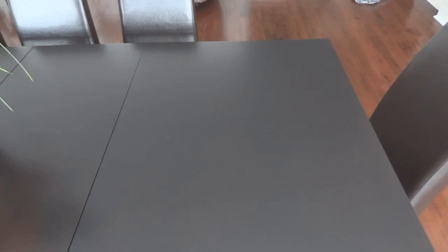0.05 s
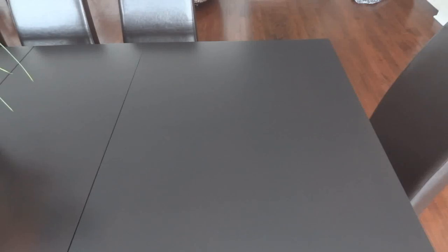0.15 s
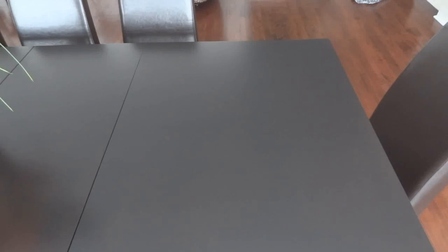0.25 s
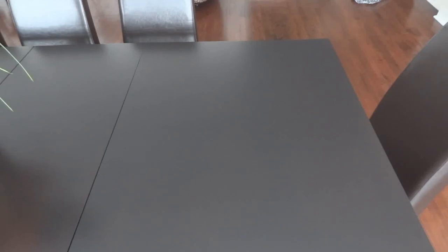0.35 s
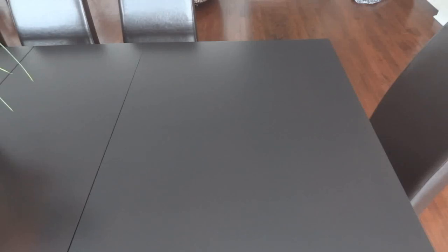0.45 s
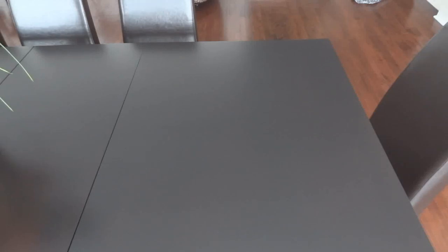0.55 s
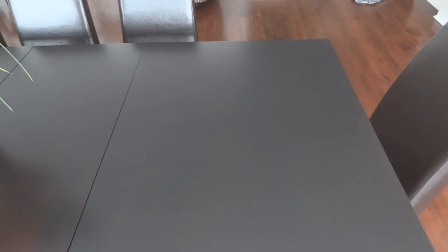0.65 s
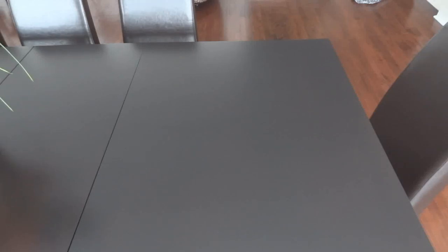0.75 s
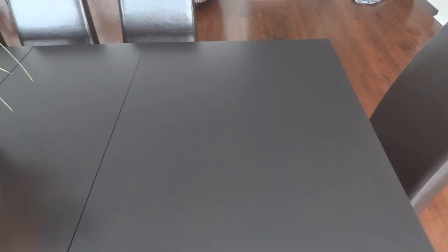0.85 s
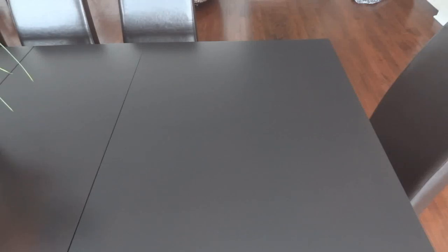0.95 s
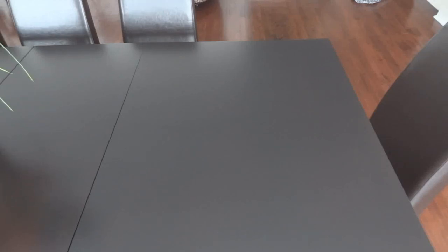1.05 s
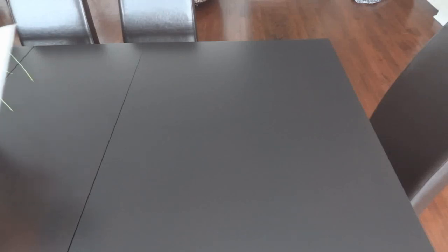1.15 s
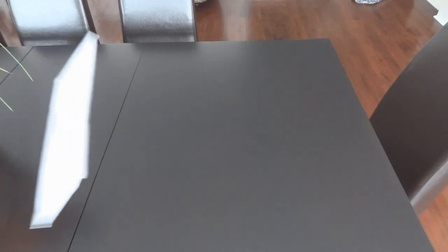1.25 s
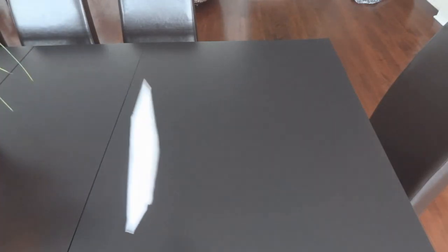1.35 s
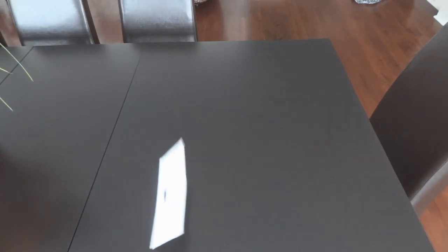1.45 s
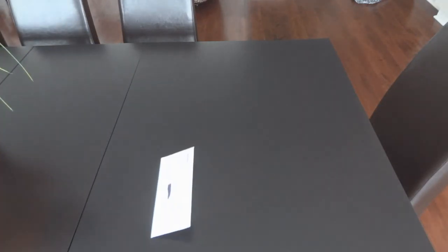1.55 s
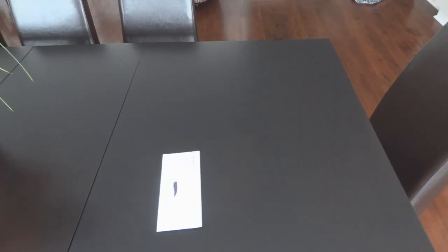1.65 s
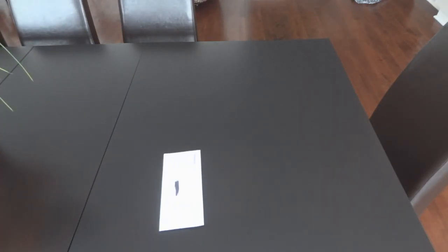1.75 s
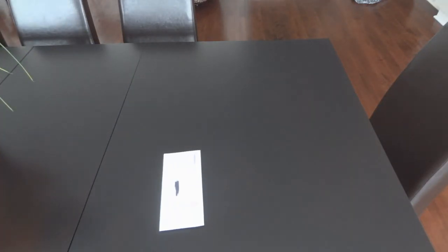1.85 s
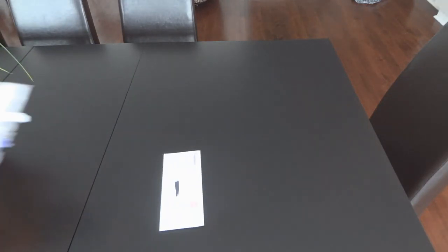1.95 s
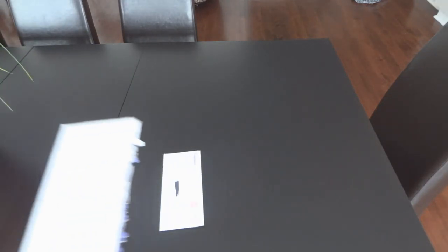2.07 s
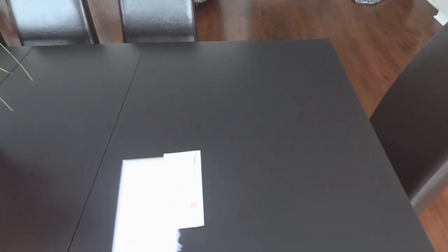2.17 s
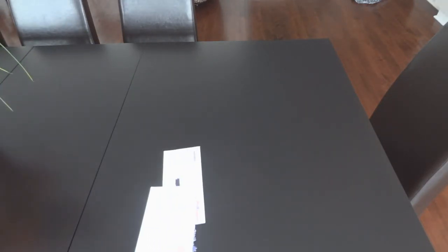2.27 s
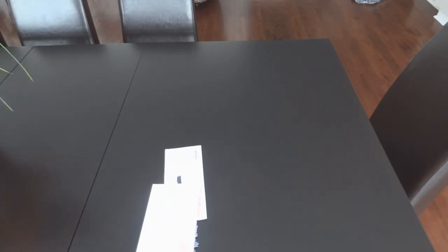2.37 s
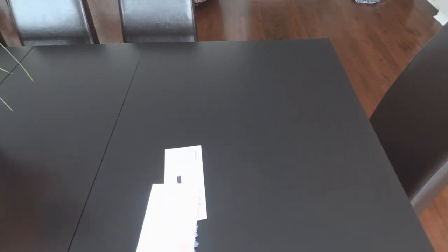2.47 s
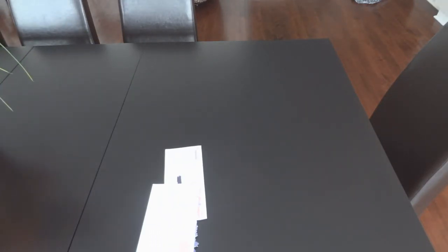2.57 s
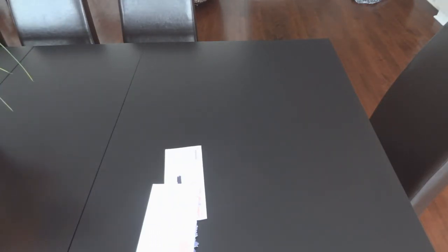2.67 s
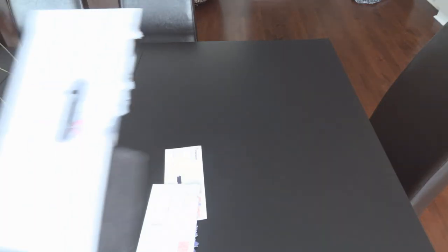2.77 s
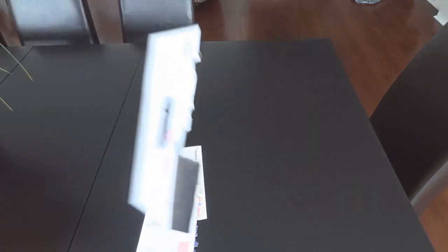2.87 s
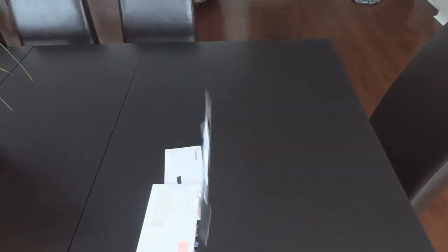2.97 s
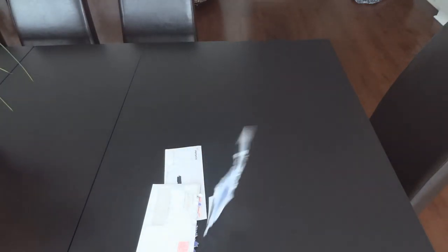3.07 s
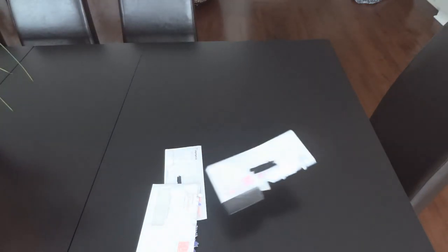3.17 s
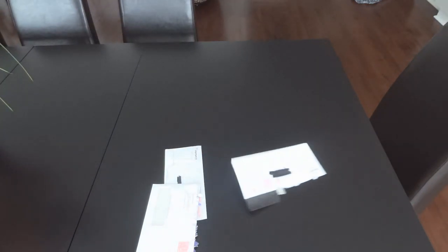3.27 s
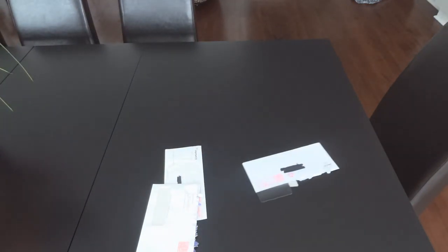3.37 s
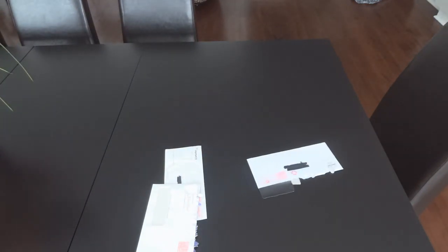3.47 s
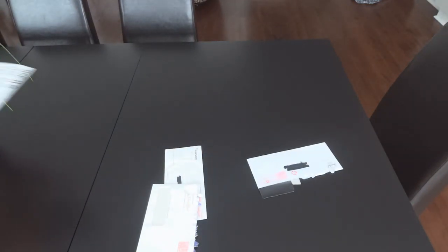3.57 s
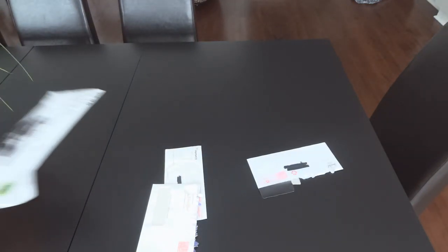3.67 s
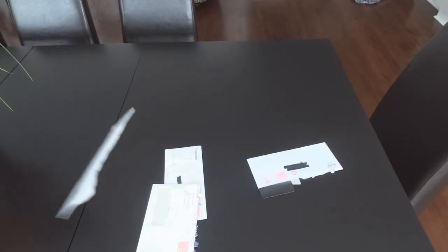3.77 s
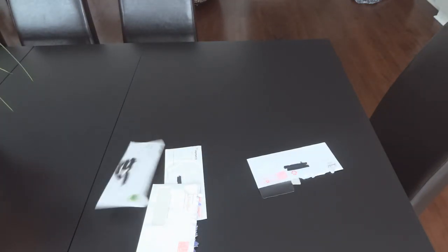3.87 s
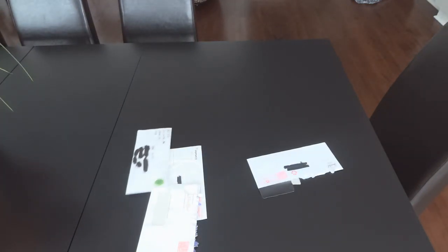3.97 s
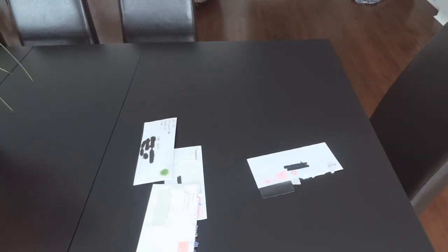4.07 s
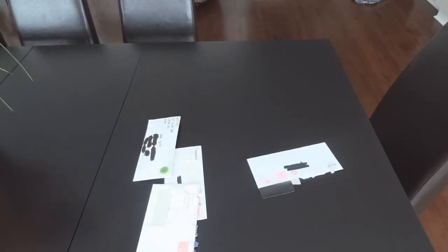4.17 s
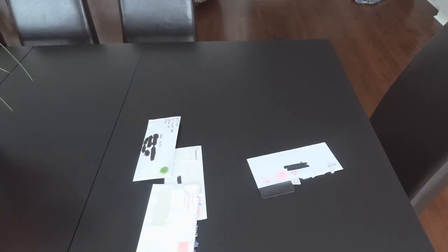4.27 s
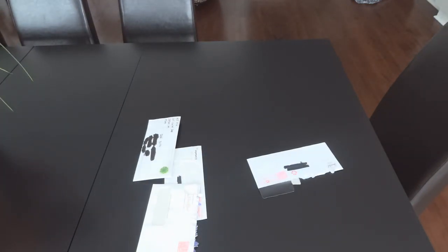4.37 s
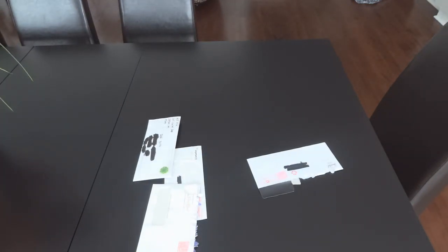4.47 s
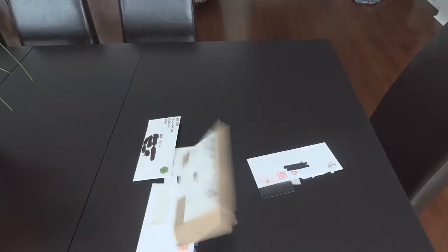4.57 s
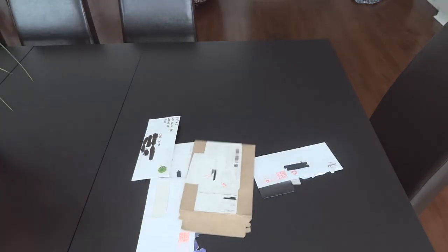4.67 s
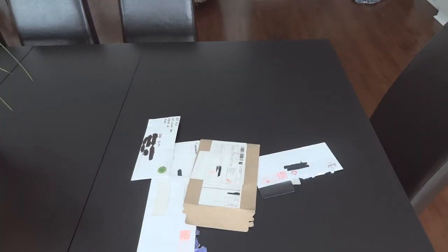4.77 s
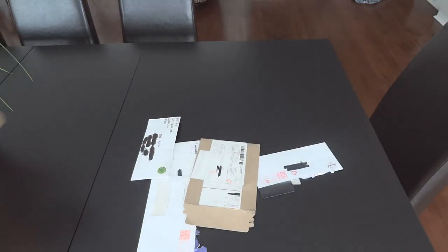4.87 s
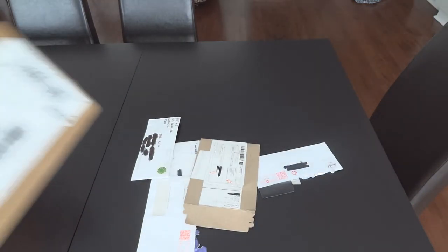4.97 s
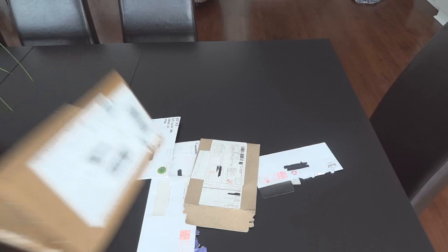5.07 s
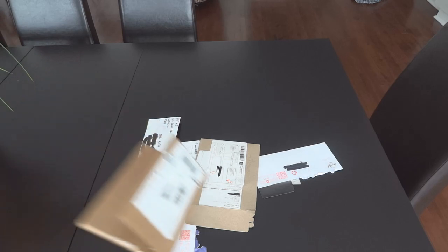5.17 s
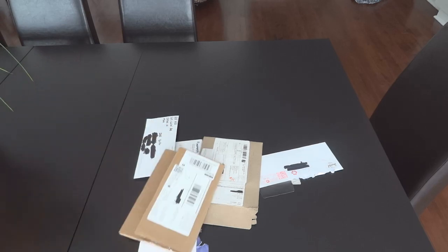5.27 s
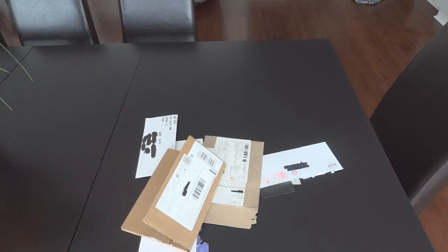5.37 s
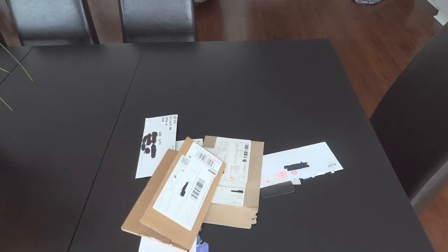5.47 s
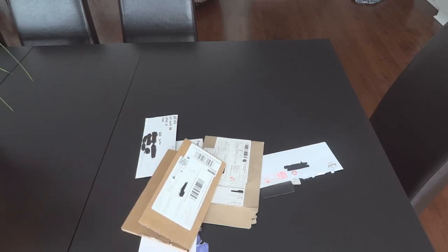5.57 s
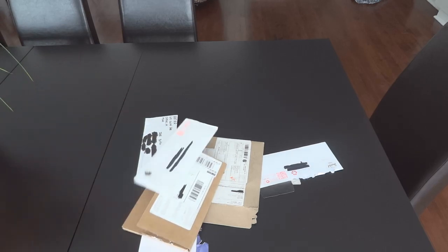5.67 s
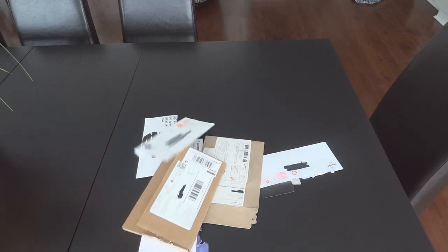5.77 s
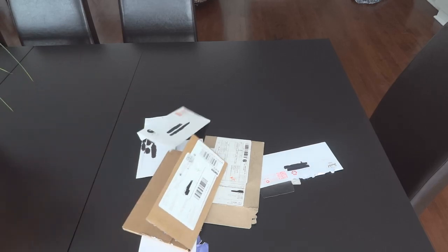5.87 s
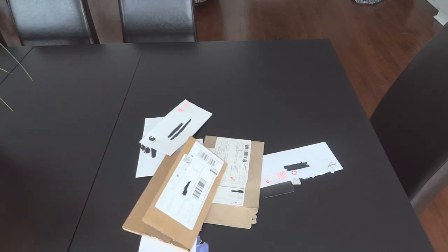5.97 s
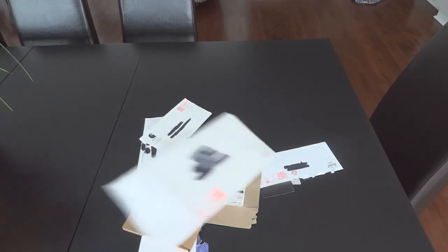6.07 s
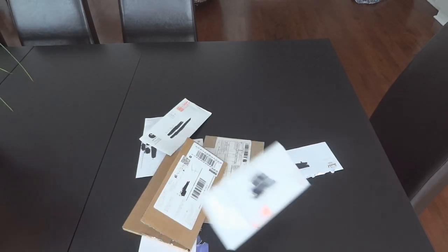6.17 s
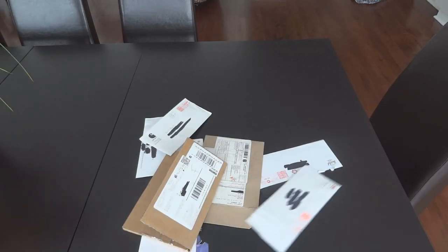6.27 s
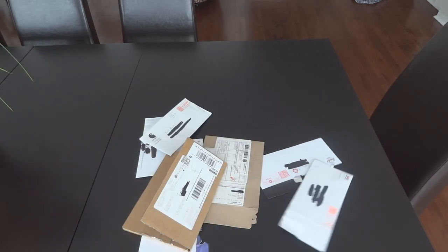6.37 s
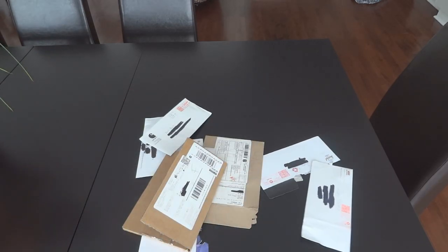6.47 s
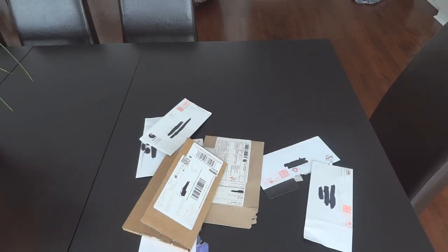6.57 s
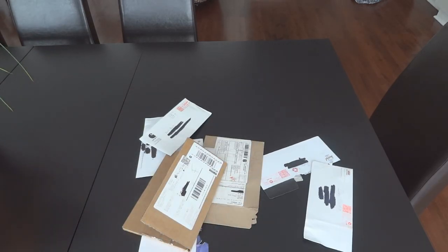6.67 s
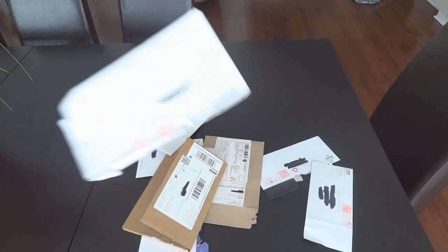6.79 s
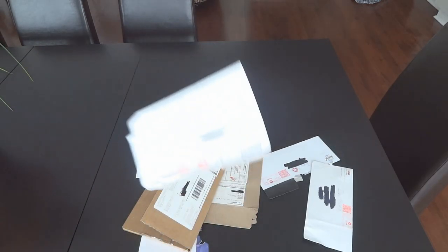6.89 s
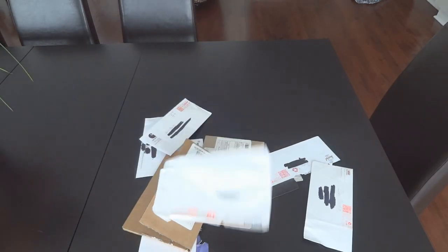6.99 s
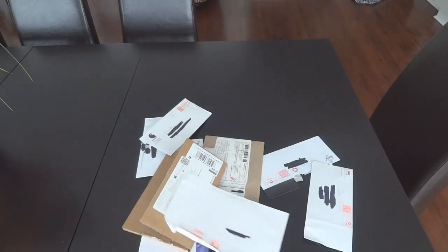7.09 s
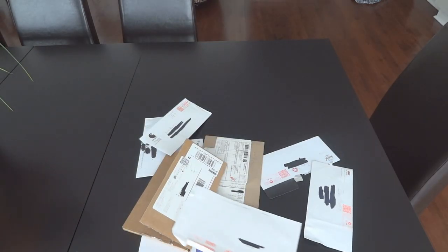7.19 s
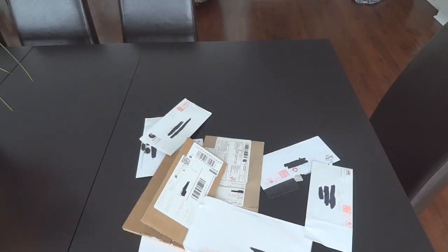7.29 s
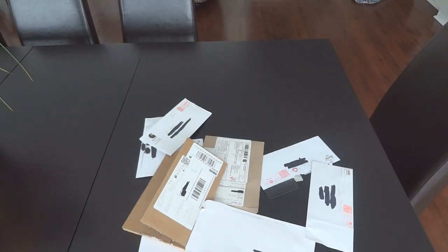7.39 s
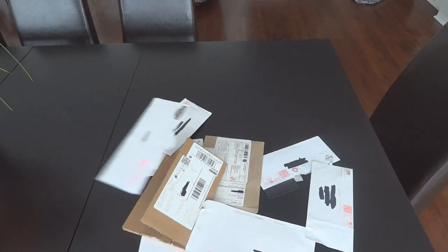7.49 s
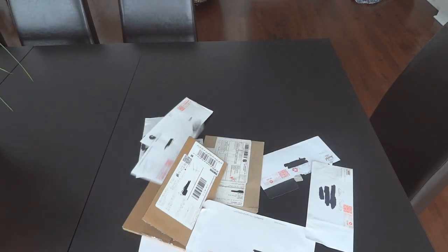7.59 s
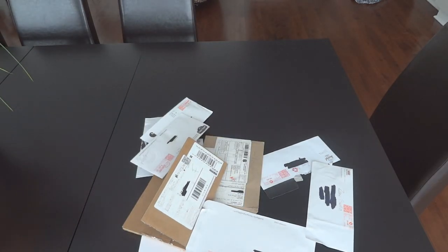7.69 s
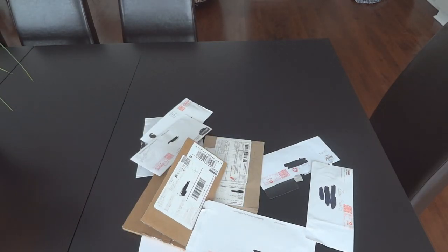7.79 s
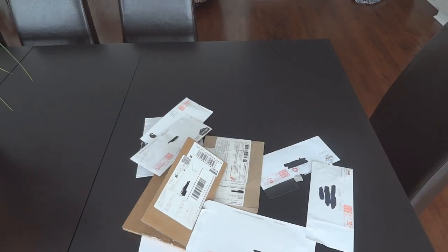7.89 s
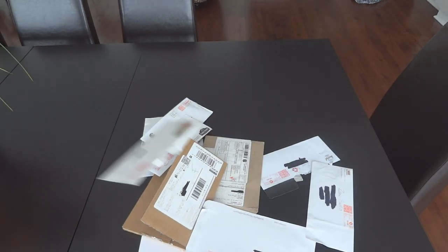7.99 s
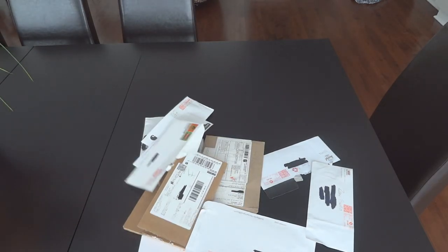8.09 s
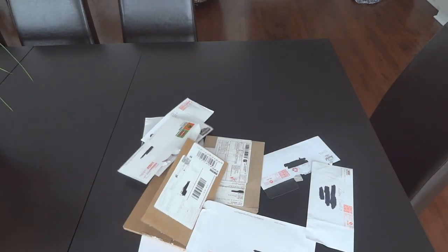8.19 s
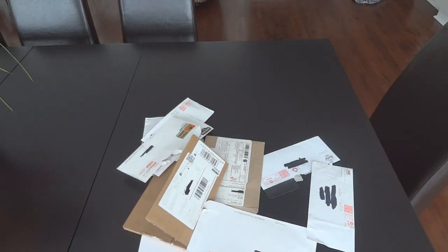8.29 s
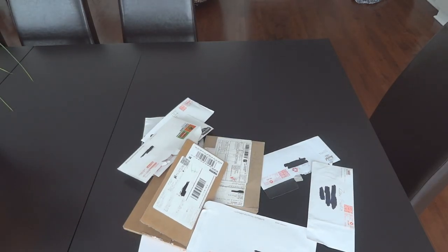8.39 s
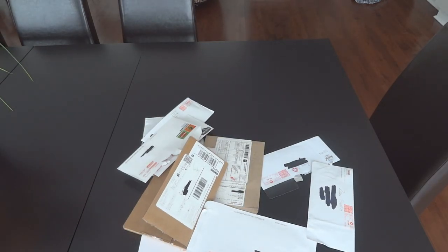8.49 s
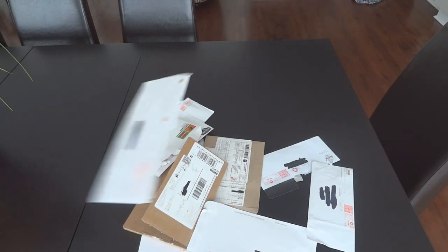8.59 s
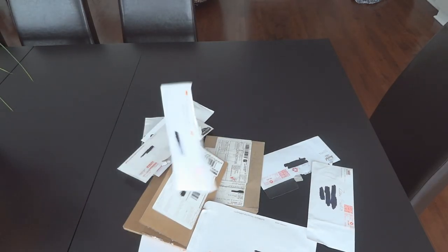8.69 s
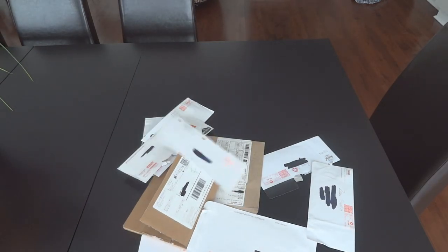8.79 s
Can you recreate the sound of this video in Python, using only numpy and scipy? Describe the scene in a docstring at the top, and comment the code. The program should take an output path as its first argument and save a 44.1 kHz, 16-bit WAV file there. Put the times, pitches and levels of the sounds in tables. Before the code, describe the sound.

In a live room with a faint steady hiss, someone quietly handles a stack of mail, then throws it piece by piece onto a hard wooden table nearby. Envelopes hit with sharp, flat slaps, a little under a second apart. Cardboard mailers follow with fuller thuds, then more envelopes land slightly faster, with brief papery rustles between throws. Each landing leaves a short room ring.

```python
"""Paper rustles over a faint hum and hiss, then envelopes and cardboard mailers are tossed one by one
onto a hard wooden table in a live room. Each landing is a few crackling slaps, coloured by the air
pocket under the sheet, with sharp ticks from edges and corners. The table top thumps in its low modes,
the room rings on, and paper rustles between throws. Many tails stop abruptly."""
import sys
import numpy as np
from scipy import signal
from scipy.io import wavfile
from scipy.ndimage import uniform_filter1d

SR = 44100
rng = np.random.default_rng(int(sys.argv[2]) if len(sys.argv) > 2 else 0)


def master_out(mix):
    """Clip the mix to full scale and print it as 16-bit PCM to the path in sys.argv[1]."""
    frames = np.transpose(np.atleast_2d(mix))
    ceiling = np.clip(frames, -1, 1)
    pcm = np.round(ceiling * 32767).astype(np.int16)
    wavfile.write(sys.argv[1], SR, pcm)


N = 389844


def gain_of(db):
    return 10 ** (np.asarray(db) / 20)


def unit_rms(x):
    return x / np.sqrt(np.mean(x ** 2) + 1e-20)


def curve_at(points, hz):
    """Read a curve of (frequency, value) points on a log frequency axis."""
    point_hz, value = np.transpose(points)
    return np.interp(np.log(hz + 1), np.log(point_hz + 1), value)


def add(mix, start_s, sound):
    part = mix[..., round(start_s * SR):][..., :sound.shape[-1]]
    part += sound[..., :part.shape[-1]]


def eq_impulse(db_at):
    """Causal impulse response with the gain db_at(Hz)."""
    log_gain = np.log(gain_of(db_at(abs(np.fft.fftfreq(2048, 1 / SR)))))
    return np.fft.ifft(np.exp(np.conj(signal.hilbert(log_gain)))).real[:1024]


# Colour of the background bed: (frequency [Hz], relative level [dB])
TONE_SPECTRUM = [(20, -28.5), (60, -13), (125, -6), (200, -11.5), (300, -11), (500, -18), (900, -18),
                 (1900, -25.5), (4000, -28), (16000, -35.5)]
# Its stereo width: (frequency [Hz], side minus mid [dB])
TONE_WIDTH = [(60, -22), (240, -3.5), (950, 3), (3770, -1.5), (15000, -13)]


def room_tone():
    """A steady bed of air hum and hiss whose colour shimmers faintly."""
    frames, hz = N // 256 + 5, np.fft.rfftfreq(1024, 1 / SR)
    real, imag, drift = rng.standard_normal((frames, 513, 2, 3)).T
    shimmer_db = 1.3 * unit_rms(uniform_filter1d(uniform_filter1d(drift[0], 12, 0), 14, 1))
    spectrum = (real + 1j * imag) * gain_of(curve_at(TONE_SPECTRUM, hz)[:, None] + shimmer_db)
    spectrum[1] *= gain_of(curve_at(TONE_WIDTH, hz))[:, None]
    mid, side = signal.istft(spectrum, nperseg=1024, noverlap=768)[1][:, :N]
    return unit_rms(np.array([mid + side, mid - side]))


def crackle(count, snaps_per_s, spread_db):
    """Friction noise with clumped little snaps of creasing paper on top."""
    sizes = gain_of(spread_db * np.minimum(rng.exponential(1, count), 4))
    snaps = sizes * (rng.random(count) < snaps_per_s / SR)
    clumps = signal.lfilter([1], [1, -.97], snaps)
    return unit_rms((0.9 + clumps) * rng.standard_normal(count))


# Paper handled or sliding; a negative fall is a swell:
# (time [s], length [s], level [dB], fall over the length [dB], treble tilt [dB/octave])
RUSTLES = [(0.104, 0.17, -59, 18, -2), (0.341, 0.4, -58, 2, -3), (0.618, 0.47, -64, 8.5, -1.5),
           (1.172, 0.14, -64.5, -8.5, -1.5), (2.05, 0.095, -56, 28, -3), (2.697, .1, -63, -22, -5.5),
           (3.364, 0.62, -52.5, 24, -1.5), (4.081, 0.33, -40, 29, -3), (4.977, 0.21, -50.5, 26, -4),
           (5.828, 0.329, -36.5, 19, -3), (6.42, 0.28, -36, 24.5, -3), (7.117, .39, -38.5, 11, -2),
           (7.781, 0.28, -46, 22, -3.5), (8.202, 0.45, -41.5, 28.5, -5)]


def rustle(length_s, level_db, fall_db, tilt_db):
    """Crackle that dies away as the paper slows, or swells; its colour wanders as the contact shifts."""
    count = round(length_s * SR)
    hz, t, spectrum = signal.stft(crackle(count, snaps_per_s=150, spread_db=1.4), SR, nperseg=256)
    envelope_db = level_db - fall_db * (t / length_s) ** 1.44  # steepens as a slide comes to rest
    octaves = np.log2(np.maximum(hz, 1200) / 8000)[:, None]
    low_cut_db = 3.3 * np.log2(np.clip(hz / 1500, .01, 1))[:, None]  # a small sheet radiates little bass
    drift = rng.standard_normal(spectrum.T.shape)
    wander_db = 1.73 * unit_rms(uniform_filter1d(uniform_filter1d(drift, 8, axis=0), 20, axis=1)).T
    spectrum *= gain_of(envelope_db + octaves * tilt_db + low_cut_db + wander_db)
    return signal.istft(spectrum, SR, nperseg=256)[1][:count] * signal.windows.tukey(count, .05)


# Voice of the mail, first the stack in the thrower's hands, then each thrown piece:
# (bass [dB], low mids [dB], treble [dB], air pocket ring [dB], contact decay to -60 dB [s])
MAIL_VOICES = [(-19.5, -13.5, -7, 7, 0.074), (-31.5, -23, -15, 8, 0.045), (-25.5, -17.5, -10.5, 6, 0.067),
               (-20, -16.5, -12, 4, 0.068), (-23, -20, -6.5, 4.5, 0.087), (-12, -11, -13.5, 7, 0.07),
               (-8.5, -2.5, -16.5, 5.5, 0.054), (-14.5, -10.5, -9, 4.5, 0.091),
               (-20.5, -17.5, -16, 3.5, 0.13), (-28, -16.5, -16, 3.5, 0.081), (-21.5, -13, -14, 6.5, 0.12),
               (-16.5, -11, -12.5, 5, 0.093), (5, -0.5, -16, 3, 0.058)]
# One list of hits per voice:
# (time [s], level [dB], air pocket pitch [Hz], brightness [dB], reverb send [dB])
MAIL_SLAPS = [
    [(.5112, -31, 3730, -4, 6.5), (.7294, -46, 1970, 2, 8), (1.2471, -52, 4640, 5, -4),
     (1.2615, -37, 760, -14, -12), (2.0742, -42.5, 4370, 6.5, -3), (3.1243, -44, 2250, -6, 4.5),
     (4.4842, -36.5, 910, -17, 1.5), (5.03, -40, 1050, -3, 0), (5.1437, -33.5, 730, -3.5, -1),
     (5.196, -37, 4960, 3.5, 3.5), (8.6408, -31.5, 3940, -0.5, -0.5)],
    [(1.5985, -15.5, 1360, 3, 1), (1.6028, 1.4, 1360, -0.5, 8), (1.6244, -6, 1350, -3, 6.5),
     (1.7894, -15.5, 1340, -2, -1.5)],
    [(2.3408, -15, 4400, -12, 5), (2.349, -11.5, 2900, 4, -2), (2.3698, -5.5, 4220, 7.5, -16),
     (2.3795, -5.5, 1770, -1.5, 8.5), (2.404, -11.5, 2300, -6, 0), (2.7911, -23, 729, -5, 7)],
    [(3.1524, -8, 3800, 2.5, 4.5), (3.1794, -14.5, 3520, -14, 4), (3.392, -15.5, 1510, -11, -1.5),
     (3.4405, -12, 1900, -2.5, -6.5)],
    [(3.972, -12, 3630, 0, -2.5), (3.9804, -5.5, 3780, -2, 1), (4.0244, -13, 1240, -3, 4.5),
     (4.185, -29.5, 5950, 4, 1.5)],
    [(4.6991, -34.5, 4760, 7, -6), (4.7052, -5.5, 1720, 4.5, 4.5), (4.7441, -3.5, 1690, -7, 1),
     (4.7766, -2.5, 848, -3, -5)],
    [(5.3298, -4.5, 960, -5.5, 1.5), (5.3564, -0.1, 880, 0.2, 8)],
    [(5.7857, -5.5, 770, -3.5, -4), (5.8551, -17.5, 790, 1.5, 1), (6.0044, -30, 775, 2, -1),
     (6.056, -35, 776, -8, .3), (6.063, -22, 5630, 3, 0)],
    [(6.3637, -10.5, 1200, -5, -5), (6.3684, -3.5, 4130, 0.5, 0), (6.3844, -12.5, 2460, -3, -4)],
    [(7.0893, -18, 3600, 0, -6), (7.1088, -14.5, 1060, 1.5, -3), (7.1253, -15.5, 1450, -10, -1.5),
     (7.149, -22, 1000, 6, -6), (7.202, -9.5, 3300, 1.5, -4.5), (7.2242, -15, 765, -13, -7),
     (7.4024, -31, 1890, 7, 2)],
    [(7.674, -28.5, 895, -7, 5), (7.6812, -11.5, 1200, -2.5, -4.8), (7.6974, -15.5, 3960, 0.5, 1.5),
     (7.7328, -10.5, 1090, -3.5, -5.5), (7.9139, -29, 1040, 2.5, 0.5)],
    [(8.1511, -17, 780, -4, -0.5), (8.1708, -5, 770, 1.5, -3.5), (8.2766, -17, 790, -7, -8.5),
     (8.3054, -15.5, 780, -5, -3), (8.5764, -39.5, 2450, 1.5, 7)],
    [(8.8215, -20, 740, 4, 0)],
]
SLAP_ATTACK_S = .0009


def slap(voice, level_db, pocket_hz, bright_db, send_db):
    """A sheet lands edge first and lies down in a crackling burst: (direct sound, reverb send)."""
    bass_db, low_mid_db, treble_db, ring_db, decay_s = voice
    bass_db -= 0.21 * bright_db  # a brighter, edgier contact has less body
    low_mid_db -= 0.21 * bright_db
    treble_db += bright_db
    t = np.arange(8192) / SR
    envelope = (1 - np.exp(-t / SLAP_ATTACK_S)) * gain_of(-60 * t / decay_s)
    contact = crackle(len(t), snaps_per_s=400, spread_db=4.8) * envelope
    sheet_eq = [(40, bass_db - 38), (110, bass_db + 11), (250, bass_db + 15), (700, low_mid_db + 14.5),
                (2500, 0.022), (9500, treble_db + 4.5), (17000, treble_db - 3)]
    ring_width = 0.096 * pocket_hz / 1300  # a small, high air pocket resonates more broadly

    def body_db(hz):
        pocket_db = ring_db * np.exp(-(np.log((hz + 1) / pocket_hz) / ring_width) ** 2)
        return curve_at(sheet_eq, hz) + pocket_db

    body = gain_of(level_db - 4) * eq_impulse(body_db)
    send = np.zeros(len(t))  # the room hears the sheet from all sides: one pulse, a smooth spectrum
    send[0] = gain_of(send_db) * np.linalg.norm(contact)
    return signal.oaconvolve(np.array([contact, send]), body[None])


# Ticks and knocks of edges and corners: (time [s], level [dB], pitch [Hz])
EDGE_TICKS = [(0.5117, -47, 3320), (1.199, -48, 905), (1.2625, -46, 590), (2.3411, -29, 4450),
              (2.792, -26, 432), (2.3802, -2, 2620), (3.1566, -15, 3620), (3.164, -20.5, 2110),
              (3.2029, -15.5, 2150), (3.3794, -26, 6000), (3.4425, -37, 330), (3.441, -23, 2640),
              (3.976, -10, 4200), (3.9803, -5, 3520), (5.145, -45, 2980), (5.1964, -28, 4640),
              (5.7857, -20, 3750), (6.3844, -9, 2480), (6.4644, -21, 2300), (7.091, -25, 3020),
              (7.092, -29, 3760), (7.109, -20, 5000), (7.126, -34, 280), (7.697, -26, 290),
              (7.2074, -12, 3300), (7.682, -14, 3550), (7.6969, -16, 3760), (7.733, -18, 1190),
              (7.9144, -30, 3950), (8.154, -28, 3080), (8.1717, -16, 3960), (8.401, -39, 3170),
              (8.4894, -35, 2590), (8.6403, -37, 3780), (8.8226, -23, 11300)]


def edge_tick(level_db, hz):
    """A stiff paper edge strikes: a click with a brief ring and a spray of noise."""
    t = np.arange(1024) / SR
    ring = np.sin(2 * np.pi * hz * t) * np.exp(-t * hz / 4.5)
    spray = 0.54 * np.diff(rng.standard_normal(len(t) + 1)) * np.exp(-t / 0.00059)
    return gain_of(level_db - 3.5) * (ring + spray)


# Tail of the live room: (frequency [Hz], decay to -60 dB [s])
REVERB_DECAY = [(100, 0.48), (260, 0.73), (700, 0.75), (1840, 0.66), (4850, 0.53), (12800, 0.31)]
# Its stereo width: (frequency [Hz], side minus mid [dB])
REVERB_WIDTH = [(60, -23), (240, -16.5), (950, -14.5), (3770, -12), (15000, -20)]


def room_reverb(send, build_s=0.0051):
    """Dense reflections build up, then die band by band; the two ears differ a little."""
    hz, t, spectrum = signal.stft(rng.standard_normal((2, SR)), SR, nperseg=256)
    spectrum *= gain_of(-60 * t / curve_at(REVERB_DECAY, hz)[:, None])
    spectrum[1] *= gain_of(curve_at(REVERB_WIDTH, hz))[:, None]
    mid, side = signal.istft(spectrum, SR, nperseg=256)[1]
    tail = np.array([mid + side, mid - side]) * (1 - np.exp(-np.arange(len(mid)) / SR / build_s))
    tail /= np.linalg.norm(tail[0])
    return signal.fftconvolve(send[None], tail, axes=1)[:, :len(send)]


# Low modes of the wooden top: (pitch [Hz], decay to -60 dB [s], attack [s])
TABLE_MODES = [(60, 0.7, .03), (86, 1.4, 0.046), (126.3, 0.85, 0.062), (181.5, 0.4, 0.009),
               (209.3, 0.84, 0.025)]
# Balance of those modes: (level [dB])
MODE_LEVELS = [-8.5, 0.5, 5.2, 7.5, 8.5]
# Their nodal lines: (along [count], across [count])
MODE_NODES = [(1, 0), (1, 0), (0, 1), (2, 1), (0, 2)]
# Blows to the top: (time [s], level [dB], place along [0-1], place across [0-1])
TABLE_THUMPS = [(1.599, -43, .32, 0.39), (2.376, -43, .23, 0.12), (3.155, -49, .26, 0.13),
                (3.972, -39, .26, 0.18), (4.706, -29.5, .31, 0.22), (5.333, -25.5, .36, 0.31),
                (5.785, -41, .49, 0.3), (6.369, -32, .47, 0.22), (7.678, -51.5, .37, 0.34),
                (8.171, -42.5, .49, 0.27), (8.819, -25.9, .49, 0.78)]


def table_thump(level_db, along, across):
    """The top rings in close pairs of modes that swell, beat and die."""
    t = np.arange(SR) / SR
    thump = np.zeros(SR)
    for mode_db, (m, n), (hz, decay_s, attack_s) in zip(MODE_LEVELS, MODE_NODES, TABLE_MODES):
        coupling = np.cos(np.pi * m * along) * np.cos(np.pi * n * across)  # zero on a nodal line
        envelope = gain_of(level_db + mode_db - 60 * t / decay_s) * (1 - np.exp(-t / attack_s)) ** 2
        twin = 0.29 * np.sin(2 * np.pi * (hz * rng.uniform(1.04, 1.1) * t + rng.random()))
        thump += coupling * envelope * (np.sin(2 * np.pi * hz * t) + twin)
    return thump


# Stretches of sound, each choking the tails of the one before: (time [s], room tone level [dB])
STRETCHES = [(0.105, -56.5), (2.041, -57.5), (2.807, -56), (3.64, -57.5), (4.61, -57.5), (4.978, -56),
             (5.744, -57.5), (6.147, -55), (6.879, -58), (7.516, -57), (8.045, -57.5), (8.683, -56)]


def choke(start_s, sound):
    """A sound stops dead at the end of the stretch in which it begins."""
    end_s = min([s for s, _ in STRETCHES if s > start_s], default=N / SR)
    return sound[..., :round((end_s - start_s) * SR)]


def scene():
    """Lay out the paper and the table, then add reverb and room tone and gate each stretch."""
    mix, tone = np.zeros((2, N)), room_tone()
    paper, table, rustles = np.zeros((2, N)), np.zeros(N), np.zeros(N)
    direct, send = paper  # views of its two rows
    for voice, slaps in zip(MAIL_VOICES, MAIL_SLAPS):
        for s, *hit in slaps:
            add(paper, s - SLAP_ATTACK_S, choke(s, slap(voice, *hit)))
    for s, *hit in EDGE_TICKS:
        add(direct, s, choke(s, edge_tick(*hit)))
    for s, *blow in TABLE_THUMPS:
        add(table, s, choke(s, table_thump(*blow)))
    for s, *gesture in RUSTLES:
        add(rustles, s, rustle(*gesture))
    rustles = gain_of([[0.5], [0]]) * rustles  # the thrower's hands are to the left
    ends = [s for s, _ in STRETCHES[1:]] + [2 * N / SR]  # the last gate stays open
    for (start_s, tone_db), end_s in zip(STRETCHES, ends):
        a, b = round(start_s * SR), min(round(end_s * SR), N)
        t = np.arange(a, b) / SR
        reverb = room_reverb(send[a:b])
        pan_db = .4 * rng.standard_normal() * np.array([[1], [-1]])  # throws land a little left or right
        action = gain_of(pan_db) * direct[a:b] + reverb + table[a:b] + rustles[:, a:b]
        gate = np.clip((end_s - t) / 0.0082, 0, 1) * np.clip((t - start_s) / 0.0026, 0, 1)
        bed = gain_of(tone_db) * tone[:, a:b] * np.maximum(gate, .45)  # the room tone only dips
        mix[:, a:b] = action * gate + bed
    lead_t = np.arange(round(STRETCHES[0][0] * SR)) / SR
    fade_in = np.clip((lead_t - .062) / .04, 0, 1)
    mix[:, :len(lead_t)] = gain_of(-68.5) * tone[:, :len(lead_t)] * fade_in
    return mix


def record(dry):
    """A limiter holds down the loudest landings and lets go as they die; a low-pass trims the top."""
    threshold_db, cutoff_hz = -17, 16000
    power_db = 10 * np.log10(abs(uniform_filter1d((dry ** 2).mean(0), 100)) + 1e-12)
    release_db = np.arange(N) * 180 / SR  # the held peak sinks 180 dB a second
    peak_db = np.maximum.accumulate(power_db + release_db) - release_db
    over_db = np.maximum(peak_db - threshold_db, 0)
    limited = dry / gain_of(.6 * uniform_filter1d(over_db, 60))
    low_pass = signal.firwin(511, cutoff_hz, window=("kaiser", 9), fs=SR)
    return signal.oaconvolve(limited, low_pass[None], "same")


dry = scene()
out = record(dry)
master_out(out)
```